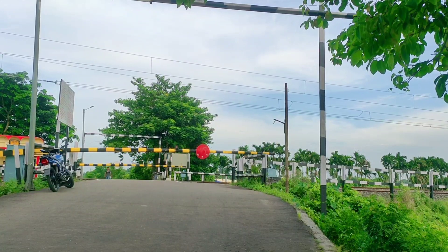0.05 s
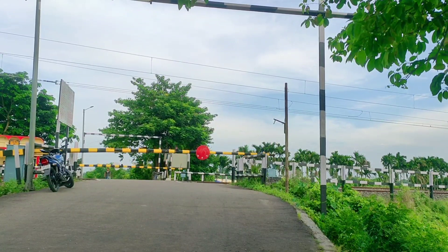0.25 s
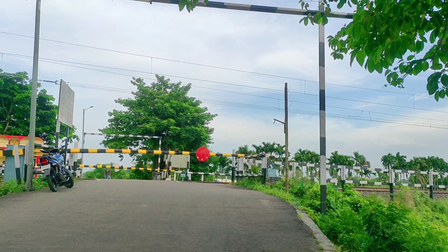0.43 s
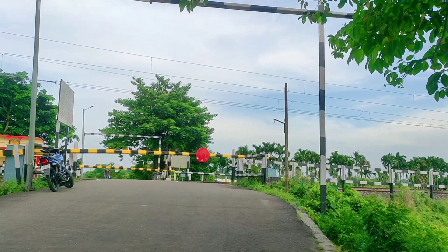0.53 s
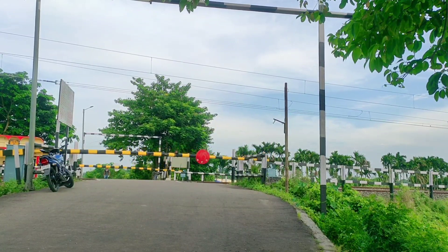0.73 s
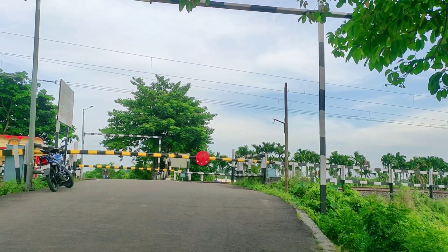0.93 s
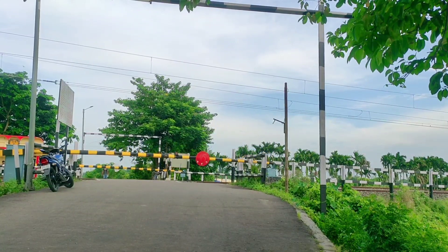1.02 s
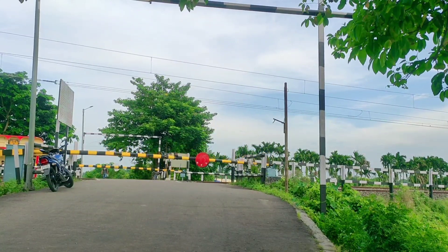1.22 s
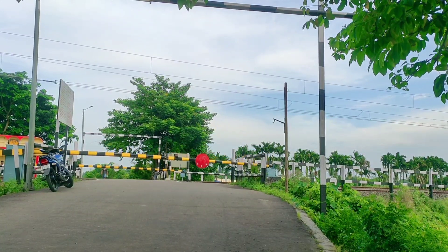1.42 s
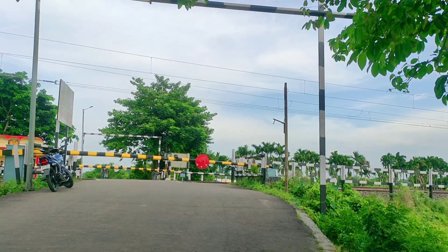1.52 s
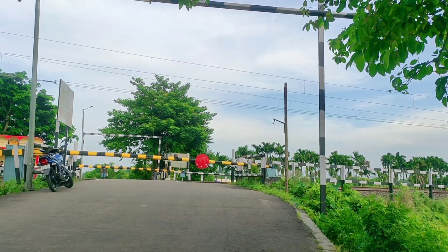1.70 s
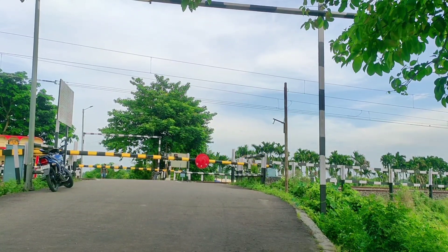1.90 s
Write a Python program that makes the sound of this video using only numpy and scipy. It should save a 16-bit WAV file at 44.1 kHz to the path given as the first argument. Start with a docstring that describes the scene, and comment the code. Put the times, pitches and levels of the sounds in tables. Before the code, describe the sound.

Steel gear clanks sharply at about 0.2 seconds, followed by light latch-like clicks. Near 0.8 seconds comes a heavy double slam, the loudest moment, with a deep boom fading after it. Further ringing, echoing knocks run from 1 to 1.7 seconds, with a scrape and squeak around 1.4 and fainter squeaks near 1.8. A low, uneven engine-like rumble and faint outdoor air lie underneath throughout.

```python
"""A sharp clank of steel gear near a railway level crossing, then light latch clicks, one heavy double
slam, further knocks, a scrape and short squeaks. Each blow excites the modes of the steel, which decay
exponentially in a wash of echoes; a deep boom follows the slam. A dry joint squeaks as it slips.
Beneath lie a low, uneven engine-like rumble and faint outdoor air."""
import sys
import numpy as np
from scipy import signal
from scipy.fft import rfft, irfft
from scipy.io import wavfile

SR = 44100
rng = np.random.default_rng(int(sys.argv[2]) if len(sys.argv) > 2 else 0)


def put_to_file(sound):
    """Save the sound as 16-bit audio at rate SR, in the file named by the first command-line argument."""
    columns = np.atleast_2d(sound).T  # one column per channel
    safe = np.clip(columns, -1, 1)
    whole_steps = np.round(safe * 32767)
    wavfile.write(sys.argv[1], SR, whole_steps.astype(np.int16))


N = 85995
TOP_HZ = 7600

# Six bands about an octave apart: (centre [Hz])
OCTAVES_HZ = [250, 500, 1000, 2000, 4000, 6500]
# Blows on the steel: (time [s], rise [s], t60 at 2 kHz [s], level in each of the six bands [dB])
BLOWS = [ (.2185, .002, .24, -49, -45, -38, -36, -35, -41),
         (.357, .006, 0.42, -49, -56, -44, -46, -49, -55.5),
         (0.511, 0.0039, 0.27, -56, -63, -52, -52.5, -45, -58.5),
         (.539, 0.0038, 1, -51.5, -65, -50, -51.5, -57, -63),
         (0.624, .002, 0.37, -55, -60, -46, -47.5, -42, -48.5),
         (0.751, 0.0065, 0.32, -37.5, -35.5, -35.5, -37, -31.5, -35.5),
         (0.79, 0.0015, 0.43, -39, -44, -39, -34, -34.5, -42),
         (.977, 0.003, 0.27, -45, -42.5, -43, -51, -45, -53.5),
         (1.058, 0.002, 0.42, -61.5, -48.5, -59, -56.5, -49, -66),
         (1.16, 0.0041, 0.3, -46.5, -46, -44, -39.5, -40, -51.5),
         (1.222, 0.0092, 0.17, -60, -49, -62.5, -42, -48, -54.5),
         (1.335, 0.0051, 0.31, -58, -61, -65.5, -68.5, -51.5, -53.5),
         (1.355, 0.014, 0.67, -53.5, -57, -48.5, -45, -39.5, -47.5),
         (1.418, .002, 0.24, -58.5, -53.5, -45.5, -40, -34.5, -41.5),
         (1.47, 0.011, .35, -61.5, -47, -48, -52.5, -61.5, -61.5),
         (1.650, .0015, 0.26, -53, -46.5, -47, -45.5, -42, -50.5),
         (1.705, 0.013, 0.1, -56, -52, -49, -57, -49, -62)]


def clatter():
    """Impact excitation: each blow drives crowded modes, chatters on rebound and leaves reverberation."""
    # Reverberation in each band: (level relative to the blow [dB], t60 [s])
    echoes = [(-6, 1.16), (-12.5, 1.9), (-8, 0.59), (-16.5, 1.77), (-12, 0.57), (-17.5, 1.46)]
    chatter = undb(0.93 * wander(rate_hz=353))
    out = np.zeros(N)
    for band, (gain, hz, (echo_db, echo_t60)) in enumerate(zip(steel_bands(), OCTAVES_HZ, echoes)):
        decay_stretch = (2000 / hz) ** 0.033  # low bands ring slightly longer
        direct_power, echo_power = 0, 0  # incoherent sounds add in power
        for start, rise, t60, *band_dbs in BLOWS:
            body = envelope(start, rise, t60 * decay_stretch, hold=0.004)
            contact = undb(-12) * envelope(start, rise, t60=0.015)
            tail = envelope(start, rise=0.066, t60=echo_t60)
            direct_power += (undb(band_dbs[band]) * (body + contact)) ** 2
            echo_power += (undb(band_dbs[band] + echo_db) * tail) ** 2
        out += np.sqrt(direct_power) * chatter * noise(gain)
        out += np.sqrt(echo_power) * noise(gain)
    return out


def steel_bands():
    """Modal overlap: close resonances merge into a rippled spectrum, returned as one gain curve a band."""
    # Resonant colour of the steelwork: (frequency [Hz], gain [dB])
    steel_response = [(180, -1.5), (290, 4.5), (360, -2.5), (430, 5.5), (520, 2), (600, -5), (740, -0.5),
                      (980, 1), (1150, 4.5), (1420, -1.5), (1680, 0.5), (2330, -0.5), (2750, -2), (3500, 3),
                      (4400, 4.5), (5300, -3.5), (6200, 5.5), (7500, -0.5)]
    modes_per_hz, width_hz, smooth_share = 0.012, 15, 0.4
    f = freqs()
    modes = (rng.random(len(f)) < modes_per_hz * SR / N).astype(float)
    offset_hz = (np.arange(len(f)) - len(f) // 2) * SR / N
    peak_shape = 1 / (1 + (2 * offset_hz / width_hz) ** 2)
    power = signal.fftconvolve(modes, peak_shape, "same")
    ripple = np.sqrt(smooth_share + (1 - smooth_share) * power / power.mean())
    passband = (f < TOP_HZ + 1000) / (1 + (150 / f) ** 6)
    gain = ripple * colour(steel_response) * passband
    band_shares = [np.interp(np.log(f), np.log(OCTAVES_HZ), row) for row in np.eye(len(OCTAVES_HZ))]
    return [gain * np.sqrt(share) for share in band_shares]


def frame_ring():
    """Free vibration: the frame's strong modes ring on after every blow, each with its own damping."""
    # Frame modes: (frequency [Hz], level relative to the blow at that frequency [dB], t60 [s])
    modes = [(190.4, -8, 1.5), (249.4, -6, 0.75), (298, -10.5, .9), (488, -16, 1.7), (513, -13, 1.68),
             (743, -22.5, 1.9), (1036, -16.5, 0.36), (1196, -15, .9), (1307, -12.5, .5), (1550, -24.5, 1.7),
             (1933, -24.5, 0.76), (2234, -10, 0.34), (3096, -22, 0.29), (3830, -17, .35),
             (4370, -15.5, 0.18)]
    out = np.zeros(N)
    for hz, db, t60 in modes:
        power = 0
        for start, rise, _, *band_dbs in BLOWS:
            blow_db = np.interp(np.log(hz), np.log(OCTAVES_HZ), band_dbs)
            power += (undb(db + blow_db) * envelope(start, rise, t60)) ** 2
        out += np.sqrt(power) * wavering_tone(hz, depth=0.00408, rate_hz=46.3)
    return out


def loose_parts():
    """Damped oscillation: loose parts caught by a blow ping at their natural frequencies."""
    # Pings: (time [s], frequency [Hz], level [dB], t60 [s])
    pings = [(.219, 1187, -39, .27), (.219, 1330, -41, .25), (.219, 1517, -42, .28), (.219, 1657, -38, .25),
             (.219, 3980, -42, .38), (.219, 4095, -44, .36), (.513, 4130, -45, .12), (.54, 3950, -45, .13),
             (.627, 4890, -39, .15), (.627, 5080, -40, .15), (.627, 3600, -43, .07), (.753, 290, -32, .2),
             (.754, 3150, -33, .08), (.754, 3450, -35, .08), (.755, 2355, -40, .3), (.797, 4050, -33, .14),
             (1.163, 880, -41, .13), (1.163, 1958, -49, .5), (1.163, 3343, -45, .3),
             (1.163, 3680, -44, .14), (1.42, 722, -41, .24), (1.42, 2892, -40, .22), (1.42, 4080, -35, .09),
             (1.42, 4477, -40, .2), (1.651, 4066, -38, .13)]
    out = np.zeros(N)
    for start, hz, db, t60 in pings:
        decay = envelope(start, rise=0.00067, t60=t60)
        out += undb(db) * decay * wavering_tone(hz, depth=0.0044, rate_hz=110)
    return out


def squeaks():
    """Stick-slip friction: a dry joint sounds in short bursts of unsteady pitch."""
    # Slips of the joint: (time [s], duration [s], frequency [Hz], level [dB])
    slips = [(0.075, 0.038, 4200, -64), (1.362, 0.031, 2580, -39.5), (1.36, 0.046, 4330, -38.5),
             (1.735, 0.043, 2630, -48), (1.76, 0.04, 2330, -49.5), (1.789, 0.016, 2580, -43.5)]
    t, out = np.arange(N) / SR, np.zeros(N)
    for start, duration, hz, db in slips:
        swell = np.sin(np.pi * np.clip((t - start) / duration, 0, 1))
        out += undb(db) * swell * wavering_tone(hz, depth=0.038, rate_hz=400)
    return out


def boom():
    """Low resonance: a deep note and narrow-band noise build up just after the slam, then decay."""
    hz = 112.64
    bass = noise(resonance(hz, width_hz=36)) + undb(-4.5) * tone(hz)
    return undb(-39) * envelope(start=0.785, rise=0.045, t60=1) * bass


def rumble_swells():
    """Amplitude modulation: wavering low tones rise and fade as soft, dull swells in the rumble."""
    # Low swells in the rumble: (time [s], frequency [Hz], level [dB])
    low_swells = [(.37, 175, -52), (.55, 155, -42.5), (1.07, 160, -46.5), (1.42, 375.7, -52),
                  (1.6, 265, -50)]
    out = np.zeros(N)
    for start, hz, db in low_swells:
        swell = envelope(start, rise=0.048, t60=0.35)
        out += undb(db) * swell * wavering_tone(hz, depth=0.0765, rate_hz=40)
    return out


def background():
    """Ambient noise: a low band of rumble and a wavering hum, like a distant engine, in broadband air."""
    # Outdoor air: (frequency [Hz], relative spectral density [dB])
    air_spectrum = [(25, -23), (60, -22), (105, -6.5), (200, -25), (400, -22.5), (700, -32), (1900, -27.5),
                    (2900, -42), (5000, -40), (7000, -35.5), (8000, -40.5)]
    rumble = undb(-51) * noise(resonance(125.5, width_hz=86))
    hum = undb(-57) * wavering_tone(115.1, depth=0.041, rate_hz=15)
    air = undb(-54) * noise(colour(air_spectrum))
    return rumble + hum + air


def undb(db):
    """Amplitude ratio of a level in decibels."""
    return 10 ** (np.asarray(db) / 20)


def freqs():
    """Frequency of each Fourier bin, at least 1 Hz."""
    return np.maximum(np.arange(N // 2 + 1) * SR / N, 1)


def colour(points):
    """Frequency response through (frequency [Hz], gain [dB]) points."""
    hz, db = np.array(points).T
    return undb(np.interp(np.log(freqs()), np.log(hz), db))


def resonance(hz, width_hz):
    """Frequency response of a steep-sided resonance."""
    return 1 / (1 + ((freqs() / hz - hz / freqs()) * hz / width_hz) ** 2)


def noise(gain):
    """Spectral shaping: white noise weighted by a gain per frequency, scaled to rms 1."""
    shaped = irfft(gain * rfft(rng.standard_normal(N)), N)
    return shaped / (np.std(shaped) + 1e-12)


def wander(rate_hz):
    """Low-pass noise: smooth random motion of rms 1 up to about the given rate."""
    return noise(np.exp(-(freqs() / rate_hz) ** 2))


def envelope(start, rise, t60, hold=0):
    """Linear rise, hold, then exponential decay by 60 dB in t60; all times in seconds."""
    age = np.arange(N) / SR - start
    return np.clip(age / rise, 0, 1) * np.exp(-np.log(1000) * np.maximum(age - rise - hold, 0) / t60)


def tone(hz):
    """Sine of rms 1 whose phase is the integral of its frequency."""
    return np.sqrt(2) * np.sin(2 * np.pi * (np.cumsum(hz * np.ones(N)) / SR + rng.random()))


def wavering_tone(hz, depth, rate_hz):
    """Random frequency modulation; depth is the rms deviation as a fraction of the frequency."""
    return tone(hz * (1 + depth * wander(rate_hz)))


def scene():
    """Superposition: all sources add in one channel."""
    steel = clatter() + frame_ring() + loose_parts() + squeaks()
    return (steel + boom() + rumble_swells() + background())[None]


def record(dry):
    """Low-pass filtering: an elliptic filter cuts the treble steeply above TOP_HZ."""
    return signal.sosfilt(signal.ellip(8, 0.3, 65, TOP_HZ, fs=SR, output="sos"), dry)


dry = scene()
out = record(dry)
put_to_file(out)
```